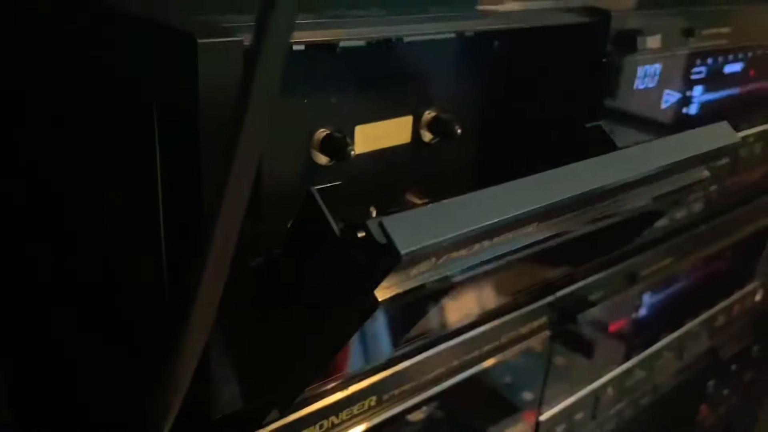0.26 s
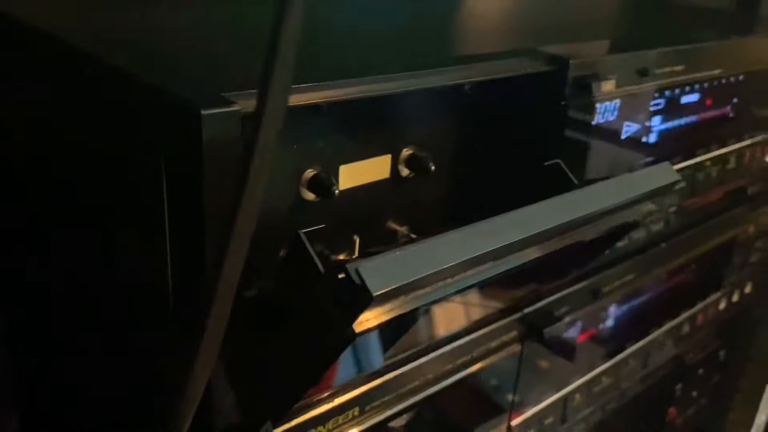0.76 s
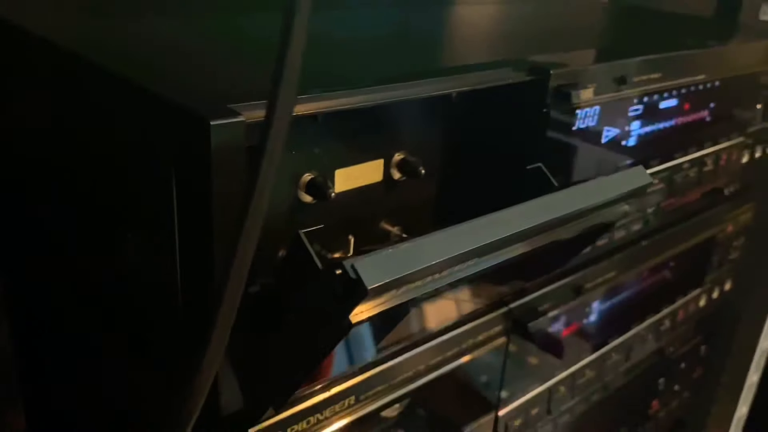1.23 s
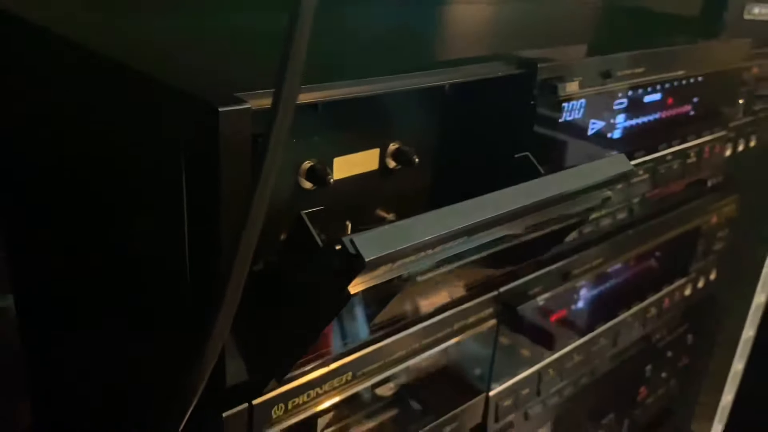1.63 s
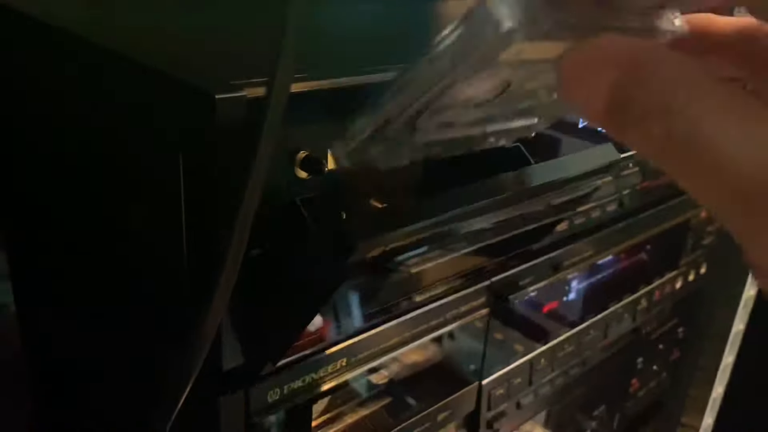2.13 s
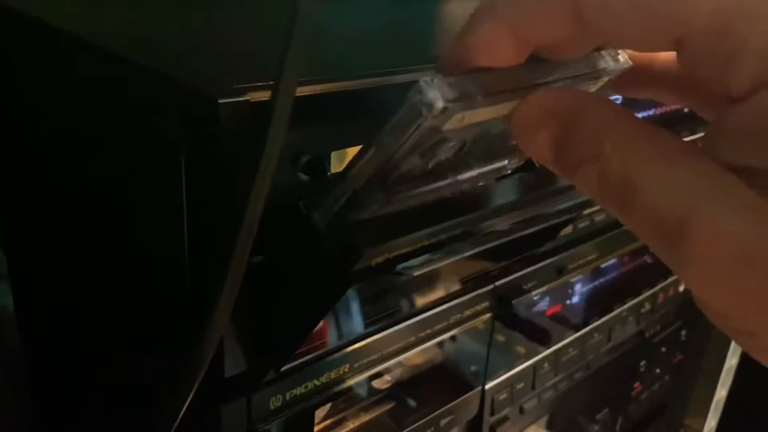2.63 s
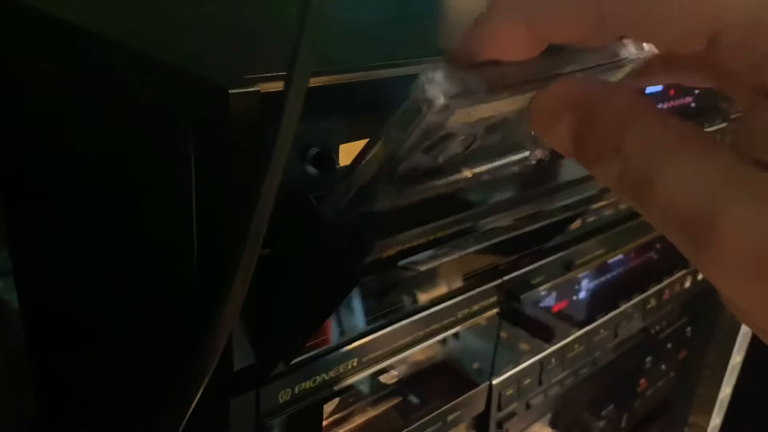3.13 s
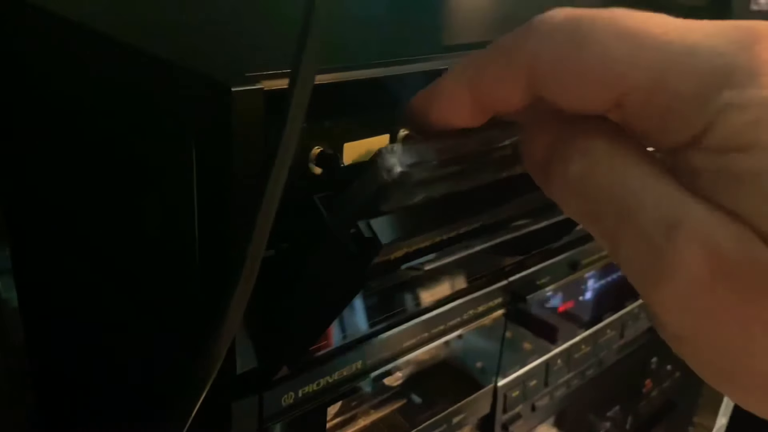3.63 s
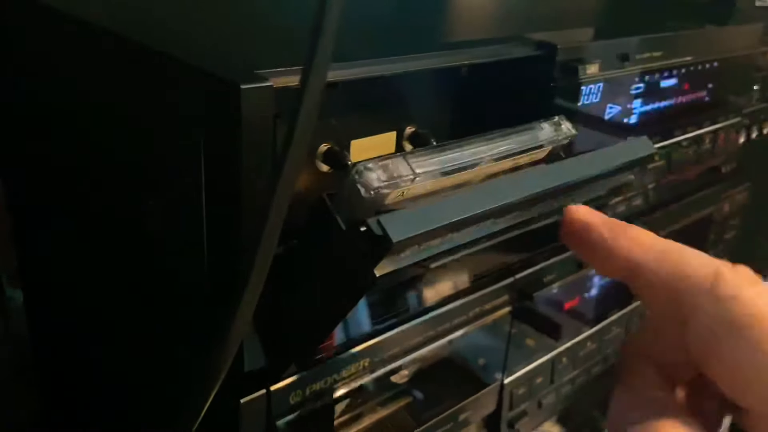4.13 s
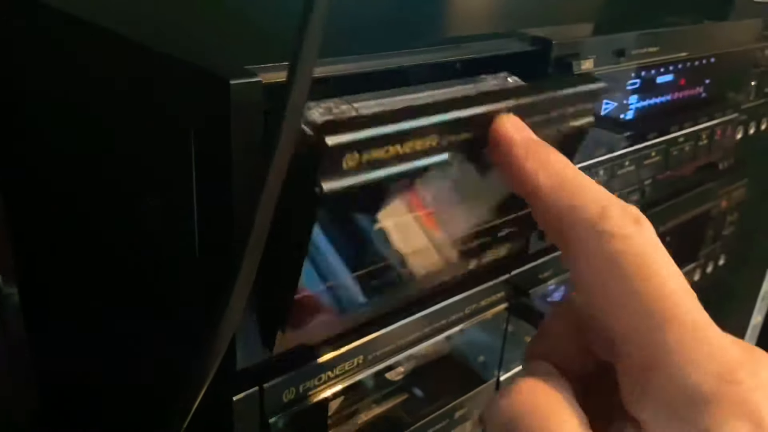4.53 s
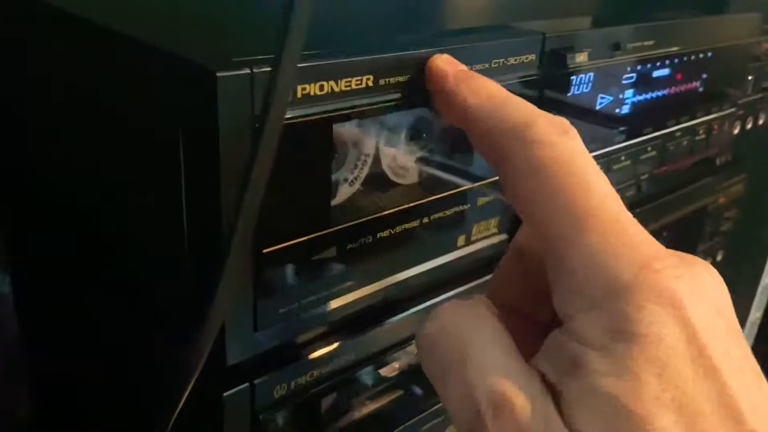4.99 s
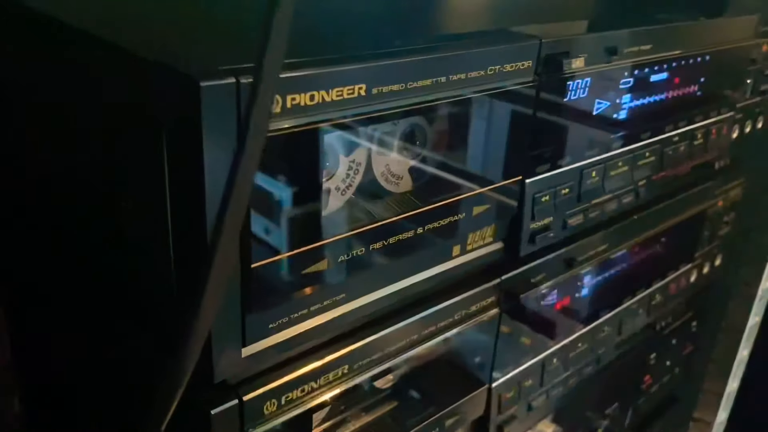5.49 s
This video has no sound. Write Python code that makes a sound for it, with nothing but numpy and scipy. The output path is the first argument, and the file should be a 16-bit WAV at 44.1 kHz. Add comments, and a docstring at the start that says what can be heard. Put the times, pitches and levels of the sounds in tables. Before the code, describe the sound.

Hard plastic cassette clatters into an open tape deck holder, slides home with a scraping squeak, then the door clunks shut in a quiet room.

```python
"""A quiet room, close to a tape deck that stands left of a small stereo microphone.
A hand drops a plastic cassette into the open door, slides it home and pushes the door shut.
Contacts are noise bursts ringing shell, holder and cabinet; rubbing is uneven noise through the same bodies.
A trembling tone makes the squeal of the slide and a low decaying sine the thump of the door.
A noise tail echoes the deck; behind it lies a bed of low rumble, soft air noise and hum lines."""
import sys
import numpy as np
from scipy import signal
from scipy.fft import rfft, irfft, next_fast_len
from scipy.io import wavfile
from scipy.ndimage import uniform_filter1d, map_coordinates

SR = 44100
rng = np.random.default_rng(int(sys.argv[2]) if len(sys.argv) > 2 else 0)


def wav_out(sig):
    """Save sig, one row per channel (or a flat mono array), as 16-bit PCM at SR to the path in sys.argv[1]."""
    wavfile.write(sys.argv[1], SR, np.round(np.clip(np.atleast_2d(sig).T, -1, 1) * 32767).astype(np.int16))


N = 253558  # length [samples]

# Touches of cassette, hand and door on the deck: (time [s], click level [dB], cabinet over click [dB],
# holder over click [dB], shell over click [dB], holder pitch [Hz], shell pitch [Hz], rise [ms], chatter t60 [ms])
CONTACTS = [(0.178, -75.5, 7, 12, 14.5, 1000, 1840, 1.8, 20),
            (0.47, -58, -24, -8, 12.5, 1190, 2110, 2.73, 40),
            (1.535, -45, -19.5, 3, 5.5, 1220, 1960, 3.65, 25), (1.573, -71, 10, 14, 9, 1040, 1730, 2.6, 11),
            (1.585, -66.5, -9, 29.5, 13, 1120, 1730, 1.53, 12),
            (1.597, -53, -25, -6, -3, 1250, 1720, 3.2, 16), (1.602, -75, 3, 22, 24, 1330, 1840, 2.7, 20),
            (1.662, -72.5, -12, 13, 7, 1170, 1700, 1.8, 13), (1.674, -78, -4, 20, 16, 1250, 1700, 0.81, 12),
            (1.699, -60, -22, 14, 12, 1300, 2020, 1.35, 16), (2.17, -37.5, -8, 3, 8, 1180, 1764, 1.03, 36),
            (2.219, -65, -11, 16, 9, 970, 1750, 2.3, 25), (2.277, -75, -2, 16, 26.5, 1020, 1810, 2.9, 20),
            (2.322, -46.5, -2, 10.5, 13, 1090, 1780, 1.59, 28),
            (2.351, -56.5, 10, 6.5, 3, 990, 1800, 3, 37), (2.382, -55, -2, -13, -3, 1240, 2250, 2.5, 59),
            (2.687, -75.5, -7, 13, 23.5, 1070, 1810, 1.74, 21),
            (2.73, -53, 2.5, 10, 6.5, 1030, 1820, 13.5, 82),
            (2.747, -39.5, -20, 4.5, 4, 1140, 1770, 2.14, 37),
            (2.755, -37.5, -7, 6.5, 5.5, 1140, 1810, 3.76, 17),
            (2.802, -40.5, -6, 2, 2, 1100, 1790, 3.3, 18), (2.864, -41, -3, 3.8, 2, 1298, 1705, 4.6, 88),
            (2.923, -60.5, -7.5, -10, -23.5, 1090, 1950, 6.3, 23),
            (2.992, -68, 10.5, 10, 13.5, 1320, 2000, 7.7, 90),
            (3.005, -50, -15.5, 7, 2, 1140, 1800, 15, 64), (3.024, -40, -15, 3.3, 6, 1080, 1800, 2.45, 98),
            (3.031, -30.5, -10.5, -6, 5, 1140, 1810, 3.17, 44),
            (3.07, -26.5, -15, -3, -2.1, 1000, 1790, 2.16, 17),
            (3.236, -64, 8.5, 12, 14, 1280, 1740, 3.4, 25),
            (3.317, -45.5, -9, -9, -1.5, 1270, 1970, 3.6, 82),
            (3.339, -41.5, -5, -5, -4, 1006, 1855, 9.9, 11),
            (3.395, -50.5, -13, -8.5, 1.5, 1120, 2090, 7.6, 30),
            (3.465, -55, -31, 0, 2, 1136, 1940, 3.4, 11),
            (3.507, -58.5, -7.5, -2.5, 11.5, 1220, 1990, 3.7, 51),
            (3.536, -51, -19, -3, 5, 1150, 1980, 19, 43), (3.635, -31.5, -6, 10, 2, 1197, 2280, 2.32, 70),
            (3.728, -65, -1.5, 18.5, 11, 1206, 1900, 3.7, 25), (3.794, -67, 5, -7, -7, 993, 1780, 1.2, 11),
            (4.151, -52, -9, -4.5, -27, 1306, 1750, 2.66, 28),
            (4.205, -72.5, 12.5, 13, -3, 1280, 1860, 2, 46), (4.265, -75, 2.5, 20, 10, 1250, 1640, 2.7, 27),
            (4.364, -72, -8, 13.5, 2, 1213, 1730, 2.36, 54), (4.574, -50, -8, 1, -1, 1270, 1730, 1.8, 73),
            (4.596, -32.5, -13, 8, 0, 1236, 2350, 4.9, 30),
            (4.771, -32, -5.5, 8.5, -4.5, 1130, 2430, 4.37, 72),
            (4.776, -25, -10.5, -0.5, -3.5, 1020, 1790, 5.8, 32),
            (4.959, -60, 12.5, 8.5, 2, 1113, 2120, 1.87, 31)]
# Cabinet resonances: (frequency [Hz], width [Hz], level [dB])
CABINET_MODES = [(183, 96, -8), (271.5, 42, 2), (338.3, 50, -1.5), (371.2, 46, -1), (473, 95, -4.5),
                 (672, 130, -7)]
# Cassette holder resonances: (frequency [multiple of the pitch], width [Hz], level [dB])
HOLDER_MODES = [(.62, 200, -12), (.8, 150.5, -6), (1, 91.8, 1.5), (1.1, 130, -7), (1.27, 180.6, -7)]
# Cassette shell resonances: (frequency [multiple of the pitch], width [Hz], level [dB])
SHELL_MODES = [(.9, 160, -14), (1, 114, 2), (1.1, 160, -2.5), (1.269, 225.3, -11.5)]
# Small stiff parts, before each hit shifts them a little: (frequency [Hz], width [Hz], level [dB])
TAB_MODES = [(2400, 69, -8.5), (3560, 80, 12), (3380, 80, 0), (4130, 46, 0), (4740, 240, -2.5),
             (4820, 50, -0.5), (5420, 42, -5)]
# Broad spectrum of the click and the scrape: (frequency [Hz], level [dB])
CLICK_SPECTRUM = [(300, -15.5), (1500, 0.5), (2500, 0), (3400, -0.5), (4500, -4.5), (5500, -6), (6500, -19),
                  (9000, -46)]
# Top-end spectrum over the click and the scrape: (frequency [Hz], level [dB])
SIZZLE_SPECTRUM = [(4000, -26.5), (6300, -5), (7200, 3.5), (8200, 5.5), (9300, -2), (10800, 1.5),
                   (12000, 0), (13500, -5), (15200, -7.5), (15900, -29)]
# Sizzle over a click of HARD_DB; it changes by SIZZLE_GROWS dB per dB of click
SIZZLE_DB, SIZZLE_GROWS, HARD_DB = 1, 0.23, -25.5
FAR_UNTIL_S, FAR_DULL_DB = 2.0, -4.5  # the cassette is still away from the microphone: less sizzle


def contacts():
    """Each contact is a blow inside a short chatter: it clicks and rings shell, holder and, more slowly, the cabinet."""
    out = np.zeros((2, N + SR))
    t = np.arange(SR // 4) / SR
    for s, db, cabinet_db, holder_db, shell_db, holder_hz, shell_hz, rise_ms, t60_ms in CONTACTS:
        sizzle_db = SIZZLE_DB + SIZZLE_GROWS * (db - HARD_DB) + FAR_DULL_DB * (s < FAR_UNTIL_S)
        chatter = burst(t, rise_ms, t60_ms)

        # The quicker the contact, the more one touch dominates; it falls two thirds into the rise
        blow = 0.79 * chatter * pair(len(t), 0.78)
        blow[:, round(rise_ms * SR / 1500)] += np.linalg.norm(chatter) / (1 + rise_ms / 2.2)
        body = filtered(blow, lambda f: (amp(holder_db) * ringing(pitched(HOLDER_MODES, holder_hz), f)
                                         + amp(shell_db) * ringing(pitched(SHELL_MODES, shell_hz), f)))

        # No two hits land alike
        tabs = [(hz * (1 + 0.034 * rng.standard_normal()), width, level + 1.5 * rng.standard_normal())
                for hz, width, level in TAB_MODES]
        edge = filtered(chatter * pair(len(t), 0.53), lambda f: (
            colour(CLICK_SPECTRUM, f) + amp(-7.0) * ringing(tabs, f)
            + amp(sizzle_db) * colour(SIZZLE_SPECTRUM, f)))

        push = burst(t, rise_ms + 6, 3.24 * t60_ms) * pair(len(t), 0.93)
        thud = amp(cabinet_db) * filtered(push, lambda f: ringing(CABINET_MODES, f))
        out[:, round(s * SR):][:, :len(t)] += amp(db) * (body + edge + thud)
    return out[:, :N]


# The door lands on the cabinet: (time [s], level [dB], frequency [Hz], t60 [ms])
THUMPS = [(4.778, -36, 77.7, 76)]


def thump():
    """The whole cabinet rocks for a few low cycles."""
    out = np.zeros(N)
    t = np.arange(SR // 4) / SR
    for s, db, hz, t60_ms in THUMPS:
        out[round(s * SR):][:len(t)] += amp(db) * burst(t, 6.3, t60_ms) * np.sin(2 * np.pi * hz * t)
    return out


# The cassette slides down its guide in two goes:
# (time [s], pressure as scrape level [dB], squeal pitch [Hz], squeal level [dB])
SLIDE = [(3.14, -86, 1760, -76), (3.22, -70.5, 1791, -61), (3.305, -63, 1800, -57.5),
         (3.34, -55.5, 1840, -63), (3.375, -62.5, 1876, -65.5), (3.42, -61.5, 2008, -54),
         (3.472, -54.5, 1990, -42), (3.494, -65.5, 1960, -60.5), (3.52, -53.5, 1997, -46.5),
         (3.55, -47.5, 2028, -39.5), (3.585, -50, 2110, -55.5), (3.626, -44, 2150, -48),
         (3.645, -72.5, 2050, -70.5)]


def squeal():
    """Stick and slip lock to one mode: a fuzzy tone whose strength and phase tremble."""
    _, hz, db = curves(SLIDE)
    phase = 2 * np.pi * np.cumsum(hz) / SR + 0.85 * wobble(160)
    return amp(db + 2.8 * wobble(130)) * np.sin(phase)


RUB_SIZZLE_DB = -0.5  # sizzle over the scrape
HOLDER_HZ = 1170  # holder pitch under rubbing
# The pushed door clamps the shell and lifts its pitch
PRESSED_S, LOOSE_SHELL_HZ, PRESSED_SHELL_HZ = 4.4, 1854, 2360


def rubbing():
    """Sliding surfaces catch and slip unevenly and feed the same bodies as the contacts."""
    scrape, cabinet, holder, shell = friction()
    pressed = np.arange(N) / SR > PRESSED_S
    grip = amp(2.3 * wobble(90) + 2.8 * wobble(350))  # shared by every layer

    def drag(alike):
        return unit(grip * amp(1.6 * wobble(40)) * pair(N, alike))

    def shell_ring(pitch_hz):
        return lambda f: ringing(pitched(SHELL_MODES, pitch_hz), f)

    return (filtered(scrape * drag(0.8), lambda f: colour(CLICK_SPECTRUM, f))
            + filtered(amp(RUB_SIZZLE_DB) * scrape * drag(0.74), lambda f: colour(SIZZLE_SPECTRUM, f))
            + filtered(cabinet * drag(0.9), lambda f: ringing(CABINET_MODES, f))
            + filtered(holder * drag(1.0), lambda f: ringing(pitched(HOLDER_MODES, HOLDER_HZ), f))
            + filtered(shell * ~pressed * drag(1.0), shell_ring(LOOSE_SHELL_HZ))
            + filtered(shell * pressed * drag(0.49), shell_ring(PRESSED_SHELL_HZ)))


# Hand strokes: the open door settles, a finger shifts, the cassette is brought up and seated in the guide,
# the hand slips off, lands, swings the door in and leaves:
# (peak time [s], rise [s], fall [s], scrape [dB], cabinet [dB], holder [dB], shell [dB])
STROKES = [(0.0, .1, 0.9, -86, -64.5, -81, -74), (1.119, .08, 0.08, -79.5, -78, -89, -73.5),
           (1.76, 0.52, 0.58, -82, -69, -80.5, -75), (2.352, 0.34, 0.18, -79.5, -63, -95, -75),
           (2.89, 0.41, 0.43, -71.5, -66, -71.5, -86), (4.201, 0.74, 0.11, -89.5, -67, -83, -71.5),
           (4.24, 0.062, .06, -68.5, -66.5, -71, -86), (4.46, .45, 0.57, -81.5, -75, -76, -93),
           (4.66, .08, .15, -78, -66.5, -57.5, -70.5), (4.758, 0.14, 0.037, -70, -57.5, -50, -59),
           (5.7, .21, 0.5, -80.5, -75.5, -86, -91)]
SWELL_DB = 24.5  # gained over a rise and lost over a fall
# What the slide sends to scrape, cabinet, holder and shell: (level over the pressure [dB])
SLIDE_FEEDS_DB = [0.5, -5, -1.5, 4.5]
# Loose parts rattle on in scrape, cabinet, holder and shell: (level relative to the click [dB])
RATTLE_DB = [-35, -30.5, -33, -33.5]
RATTLE_T60_S = 0.61


def friction():
    """Gains of scrape, cabinet, holder and shell: slide, hand strokes and the rattle after contacts add in power."""
    t = np.arange(N) / SR
    pressure_db = curves(SLIDE)[0]
    power = amp(2 * (pressure_db + np.c_[SLIDE_FEEDS_DB]))
    for peak, rise, fall, *db in STROKES:
        away = np.where(t < peak, (peak - t) / rise, (t - peak) / fall)
        power += np.outer(amp(2 * np.array(db)), amp(-2 * SWELL_DB * away))
    # Every contact kicks the rattle, which then dies away exponentially
    kick_at = [round(row[0] * SR) for row in CONTACTS]
    kick_power = [amp(2 * row[1]) for row in CONTACTS]
    kicks = np.bincount(kick_at, kick_power, N)
    rattle = signal.lfilter([1], [1, -amp(-2 * 60 / (RATTLE_T60_S * SR))], kicks)
    return np.sqrt(power + amp(2 * np.c_[RATTLE_DB]) * rattle)


# Decay of the room: (frequency [Hz], t60 [s])
WALL_DECAY = [(100, 0.97), (260, 0.3), (700, .22), (1800, 0.16), (5000, 0.16), (13000, 0.037)]


def walls(x):
    """Each frequency of the room's answer dies at its own speed, alike at both ports in the bass."""
    out = np.zeros((2, N + 2 * SR))
    step = SR // 4  # a new noise tail every quarter second
    for i in range(0, N, step):
        hz, t, (a, b) = signal.stft(rng.standard_normal((2, SR // 2)), SR, nperseg=256)
        alike = 1 / (1 + (hz[:, None] / 600) ** 2)
        z = np.array([a, alike * a + np.sqrt(1 - alike ** 2) * b])
        decay = amp(-60 * t / along(WALL_DECAY, hz)[:, None])
        tail = signal.istft(z * decay, SR, nperseg=256)[1]
        wet = signal.fftconvolve(x[:, i:i + step], tail / np.linalg.norm(tail[0]), axes=1)
        out[:, i + 200:][:, :wet.shape[1]] += wet  # pre-delay of 200 samples
    return out[:, :N]


# Low house rumble: (frequency [Hz], level [dB])
RUMBLE_SPECTRUM = [(20, -34), (32, -15), (50, 3.5), (80, -0.5), (110, 4), (160, -7), (250, -12.5),
                   (400, -24.5), (800, -48.5)]
# Slow swells of the rumble, a little stronger while the deck is handled: (time [s], level [dB])
RUMBLE_LEVEL = [(0.0, -58), (0.4, -60.5), (2.6, -60.5), (2.93, -57.5), (4.5, -58.5), (4.85, -56.5),
                (5.36, -60.5), (5.75, -60.5)]
# Soft air noise: (frequency [Hz], level [dB])
AIR_SPECTRUM = [(150, -4.5), (400, 12), (700, 7), (1100, 5), (1700, 6), (2500, -7), (5000, -10.5),
                (8600, -7.5), (9300, -2), (10000, -3.5), (12500, -18), (14300, -18.5), (15300, -52.5)]
AIR_DB, AIR_WAVERS_DB = -74.5, 0.8
# Steady hum lines, before they waver: (frequency [Hz], peak level [dB])
HUM_LINES = [(118.4, -74), (199.2, -81), (253.0, -77.5), (899.0, -99), (1007, -84)]


def room():
    """Low house rumble, soft air noise and wavering hum lines."""
    rumble_db, = curves(RUMBLE_LEVEL)
    air_db = AIR_DB + AIR_WAVERS_DB * wobble(2.7)
    t = np.arange(N) / SR
    hum = sum(amp(db + 1.1 * wobble(7.8)) * np.sin(2 * np.pi * hz * t + 0.33 * wobble(8.2))
              for hz, db in HUM_LINES)
    rumble = amp(rumble_db) * rush(RUMBLE_SPECTRUM, patchy_db=1.2)
    air = amp(air_db) * rush(AIR_SPECTRUM, patchy_db=0.2)
    return rumble + air + hum


# Stereo width of the rumble and air beds: (frequency [Hz], left-right likeness [0 to 1])
BED_LIKENESS = [(30, .93), (80, 0.92), (300, 0.4), (700, 0.067), (5000, 0.15)]


def rush(spectrum, patchy_db):
    """Stereo noise of rms 1 with patches of random gain in time and frequency."""
    z = signal.stft(rng.standard_normal((2, N)), nperseg=512)[2]
    field = uniform_filter1d(rng.standard_normal(z.shape[1:]), size=6, axis=0)
    field = uniform_filter1d(field, size=14, axis=1)
    noise = signal.istft(z * amp(patchy_db * unit(field)), nperseg=512)[1][:, :N]

    def mid_side(hz):
        turn = np.arccos(np.clip(along(BED_LIKENESS, hz), -1, 1)) / 2
        return amp(along(spectrum, hz)) * np.array([np.cos(turn), np.sin(turn)])

    mid, side = filtered(noise, mid_side)
    return unit(np.array([mid + side, mid - side]))


def burst(t, rise_ms, t60_ms):
    """Envelope of chatter: it swells smoothly, then dies away."""
    rise = rise_ms / 1000
    swell = np.sin(np.pi / 2 * np.minimum(t / rise, 1)) ** 2
    return swell * amp(-60000 * np.maximum(t - rise, 0) / t60_ms)


def pitched(modes, pitch_hz):
    """Modes that shift with grip and position."""
    return [(k * pitch_hz, width, db) for k, width, db in modes]


def ringing(modes, f):
    """Causal sum of resonances, weak far below and above them; white noise of rms 1 comes out at rms 1."""
    total = 0
    for k, (centre, width, db) in enumerate(modes):
        mode = 1j * f * width / (centre * centre - f * f + 1j * f * width)
        total = total + (-1) ** k * amp(db) * mode
    low_cut = 1j * f / (modes[0][0] + 1j * f)
    high_cut = 1 / (1 + 1j * f / modes[-1][0])
    return unit(total * low_cut * high_cut)


def colour(points, f):
    """A broad spectrum; white noise of rms 1 comes out at rms 1."""
    return unit(amp(along(points, f)))


def pair(n, alike):
    """Left and right noise that share a part."""
    a, b = rng.standard_normal((2, n))
    return np.array([a, alike * a + np.sqrt(1 - alike ** 2) * b])


def wobble(rate):
    """A smooth random curve, rate knots a second."""
    knots = rng.standard_normal(int(N * rate / SR) + 4)
    return map_coordinates(knots, [np.arange(N) * rate / SR])


def curves(rows):
    """One value per sample for each column after the time; -130 (silence for a level) outside the rows."""
    s, *cols = np.transpose(rows)
    return [np.interp(np.arange(N) / SR, s, c, left=-130, right=-130) for c in cols]


def along(points, hz):
    """Reads (frequency [Hz], value) points on a log frequency axis."""
    f, v = np.transpose(points)
    return np.interp(np.log(hz + 1), np.log(f + 1), v)


def filtered(x, response):
    """Shapes x with a complex response of frequency, zero-padded to leave room for the ringing."""
    n = x.shape[-1]
    m = next_fast_len(2 * n if n < SR else n + SR)
    return irfft(rfft(x, m) * response(np.fft.rfftfreq(m, 1 / SR)), m)[..., :n]


def amp(db):
    """Decibels to linear gain."""
    return 10 ** (np.asarray(db) / 20)


def unit(x):
    """Scales x to rms 1."""
    return x / np.sqrt(np.mean(np.abs(x) ** 2) + 1e-20)


# The deck as it reaches the two ports: (frequency [Hz], lead of the left [radians])
LEFT_LEAD = [(100, 0.15), (300, 0), (600, 1.4), (1000, 0.44), (1400, 1.3), (1800, 1.3), (2600, 1.4),
             (3600, 0.74), (4600, .3), (6000, 0.22)]


def scene():
    """Deck, its echo in the room, the thump of the door, and the room itself."""
    deck = contacts() + rubbing() + squeal()
    deck = filtered(deck, lambda hz: np.exp(0.5j * along(LEFT_LEAD, hz) * np.array([[1], [-1]])))
    return deck + amp(-9.5) * walls(deck) + thump() + room()


# Port balance: (frequency [Hz], left over right [dB])
LEFT_OVER_RIGHT = [(30, 1.5), (110, 4), (300, 0.5), (800, 5), (2500, 3), (5200, 6.5)]
SHARED_HZ, TOP_HZ = 6000, 16500  # one treble signal from here up; nothing from the top on
TREBLE_LAG = 10  # [samples]


def record(dry):
    """Lows and mids come from two ports, the left louder; the treble is one signal, late and inverted on the left."""
    def share(hz):
        return 1 / (1 + (SHARED_HZ / (hz + 1)) ** 24)

    def port_response(hz):
        balance = amp(along(LEFT_OVER_RIGHT, hz) / 2 * np.array([[1], [-1]]))
        return np.sqrt(1 - share(hz)) * balance

    def treble_response(hz):
        late = -np.exp(-2j * np.pi * hz * TREBLE_LAG / SR)
        return np.sqrt(share(hz)) * np.array([late, np.ones_like(hz)])

    ports = filtered(dry, port_response)
    treble = filtered(dry[1], treble_response)
    return filtered(ports + treble, lambda hz: hz < TOP_HZ)


dry = scene()
out = record(dry)
wav_out(out)
```